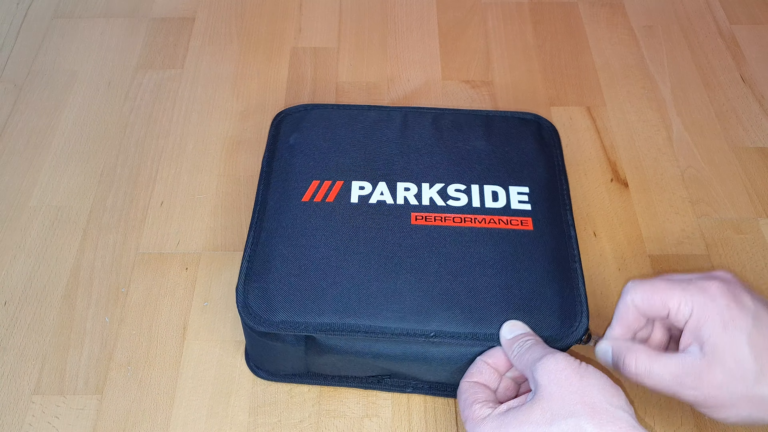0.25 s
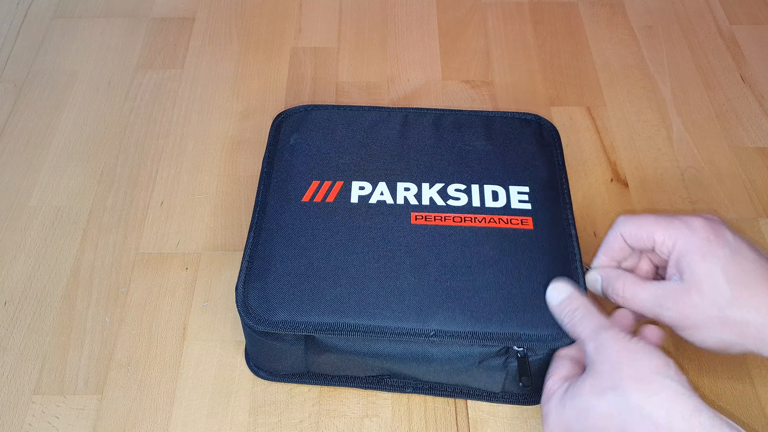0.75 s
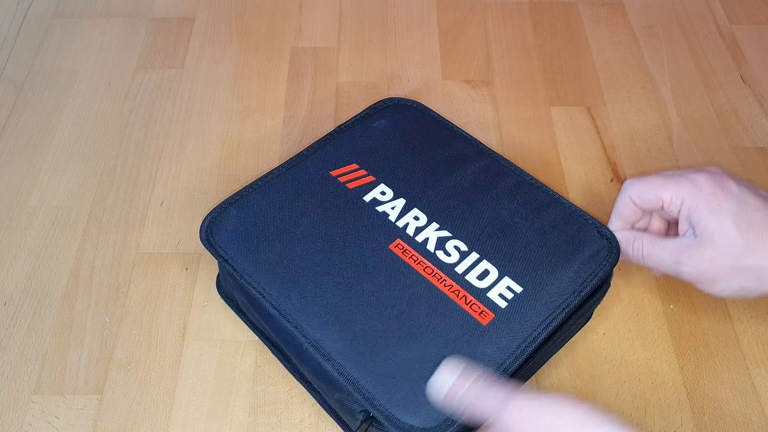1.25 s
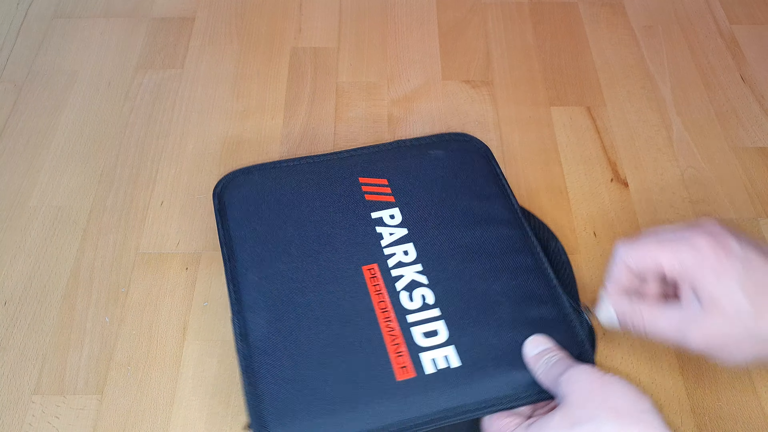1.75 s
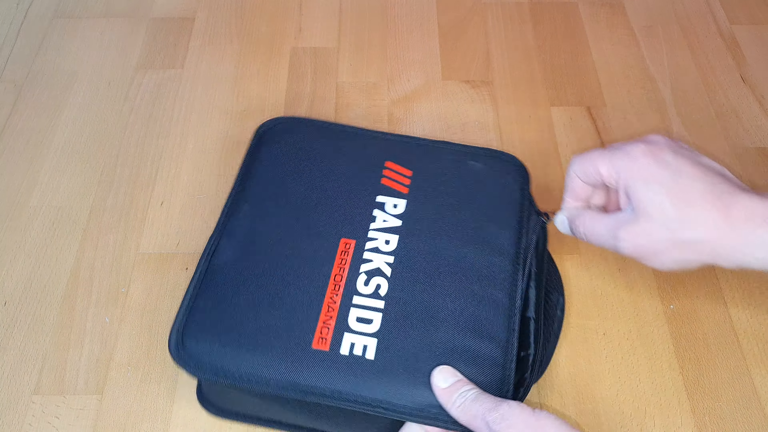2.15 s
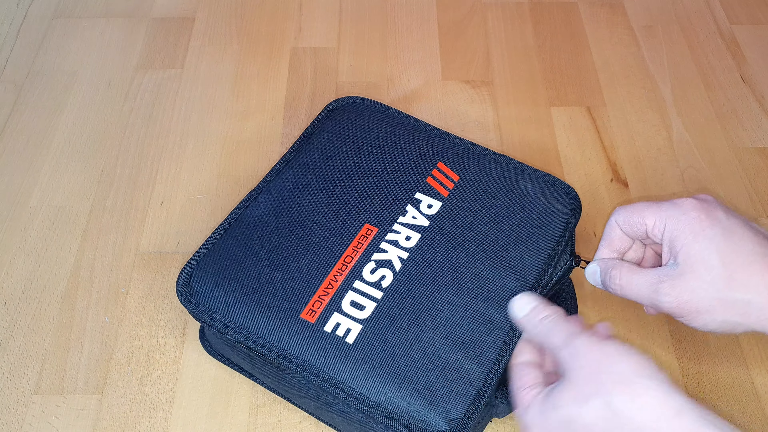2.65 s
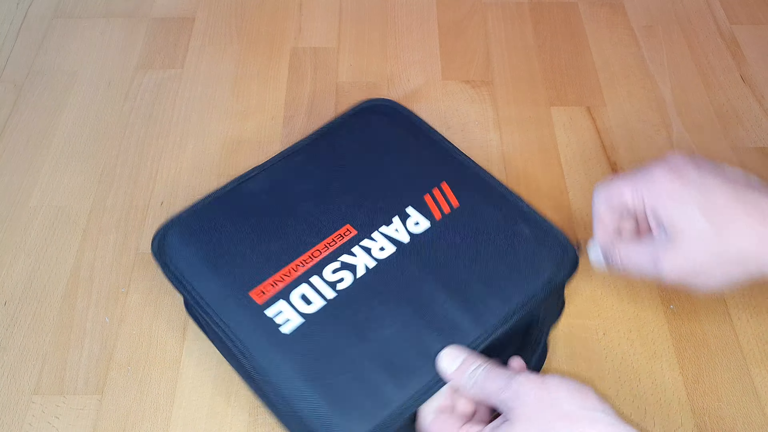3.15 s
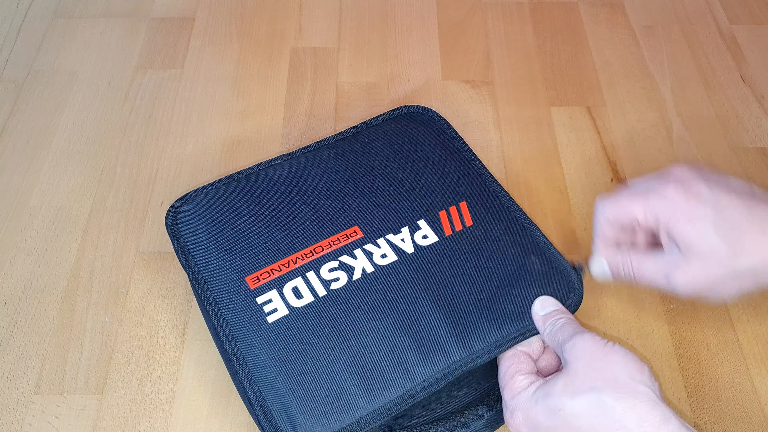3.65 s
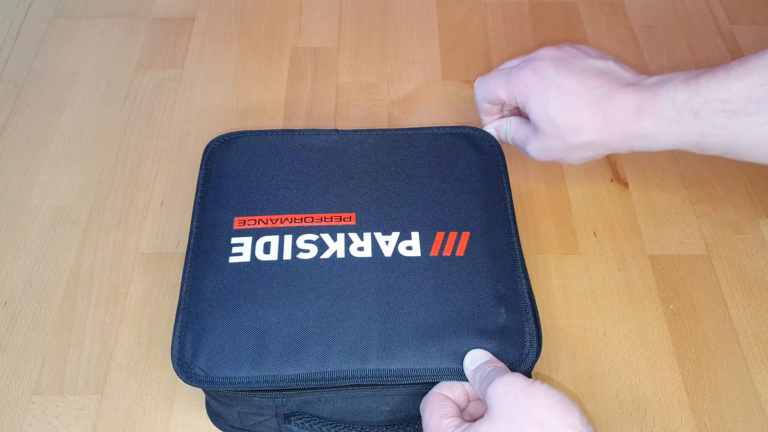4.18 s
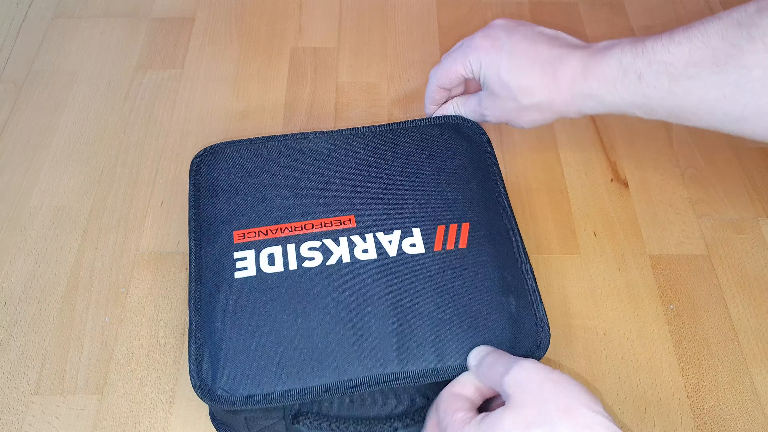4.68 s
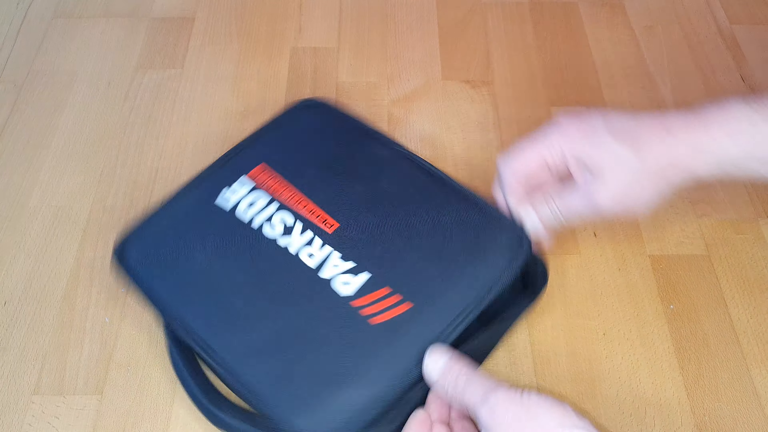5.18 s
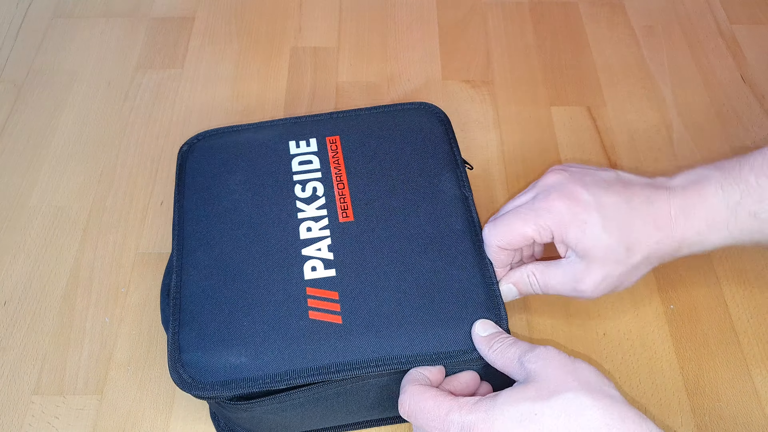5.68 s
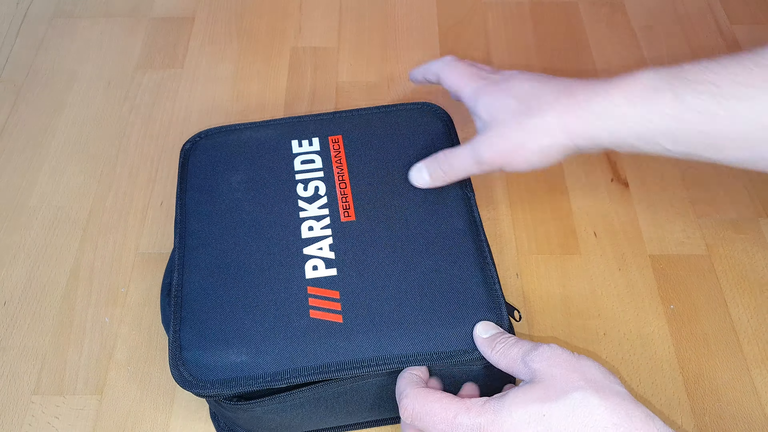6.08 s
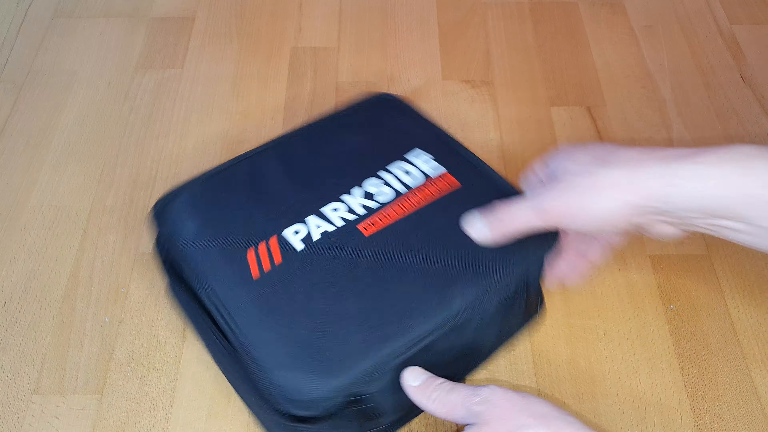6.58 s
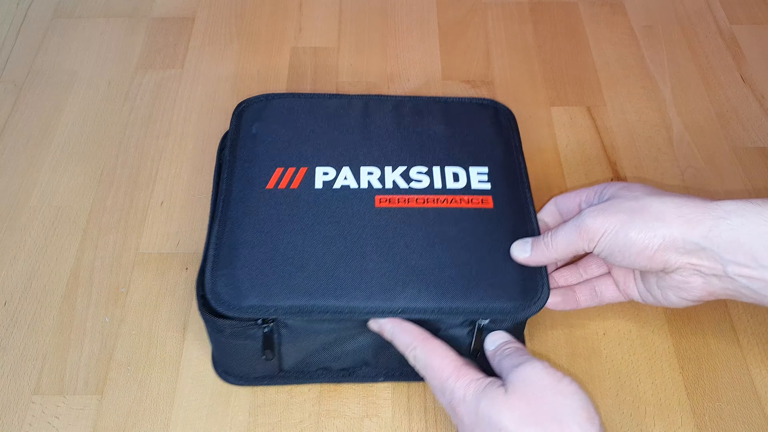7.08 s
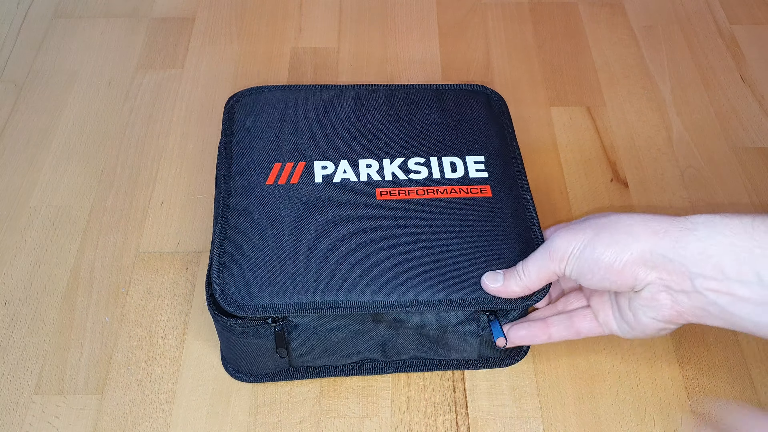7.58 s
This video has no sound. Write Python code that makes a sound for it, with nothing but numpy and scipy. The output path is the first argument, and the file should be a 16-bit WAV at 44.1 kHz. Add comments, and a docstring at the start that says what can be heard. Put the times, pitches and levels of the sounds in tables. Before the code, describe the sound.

Hands handle a stiff fabric case on a wooden table, heard close and in stereo in a quiet room. Soft cloth rubbing and a light knock open the sound. At about 1 second the zipper gives a quick, rising zip with a swish and a bump. A lower, louder buzzing pull runs from 1.8 to 2.1 seconds, slowing and ending in a knock. Cloth slides, ticks and soft hollow knocks follow, with a faint rumble from the table. The third pull, uneven and buzzy, lasts from 3.7 to 4.1 seconds. A couple of knocks come around 4.5 seconds, then the case slides and gives its strongest dull thump at 5.5 seconds. The metal pull tab jingles faintly just before 6 seconds. More hissing fabric and bumps follow from 6.4 to 7 seconds, and lighter rubbing and ticks continue until about 8 seconds.

```python
"""A zipper is pulled in three short strokes round a stiff fabric case that two hands turn on a wooden table.
The slider bumps over the teeth, making a buzz that rings the hollow case. Cloth hisses over wood and
skin, the case knocks and ticks, and the table rumbles. The metal pull tab gives one short jingle when
it is let go. The room is quiet, and two microphones listen close by."""
import sys
import numpy as np
from scipy import signal
from scipy.fft import rfft, irfft, next_fast_len
from scipy.io import wavfile
from scipy.ndimage import uniform_filter1d

SR = 44100
rng = np.random.default_rng(int(sys.argv[2]) if len(sys.argv) > 2 else 0)


def persist_wave(psi):
    """Save psi, clipped to +-1, as 16-bit WAV."""
    counts = np.round(np.clip(psi, -1, 1) * 32767).astype(np.int16)
    wavfile.write(sys.argv[1], SR, np.atleast_2d(counts).T)


N = 345303


def gain_of(db):
    return 10 ** (np.asarray(db) / 20)


def unit_level(x):
    return x / np.sqrt(np.mean(x ** 2) + 1e-20)


def curve_at(points, hz):
    """Joins (frequency, value) points and reads off the value at hz."""
    point_hz, value = np.transpose(points)
    return np.interp(np.log(hz + 1), np.log(point_hz + 1), value)


def add(mix, start_s, sound):
    part = mix[round(start_s * SR):][:len(sound)]
    part += sound[:len(part)]


def filtered(x, gain):
    """Turns each frequency up or down by gain(hz)."""
    size = next_fast_len(N + SR // 4, True)
    return irfft(rfft(x, size) * gain(np.fft.rfftfreq(size, 1 / SR)), size)[..., :N]


def coloured(x, curve):
    """Shapes a sound with a curve of (frequency, dB) points."""
    return filtered(x, lambda hz: gain_of(curve_at(curve, hz)))


def response(modes, hz):
    """How an object answers a push: its modes (ringing pitches) add up, with alternating signs."""
    return sum((-1) ** k * gain_of(db) * width * hz / (width * hz + 1j * (hz ** 2 - pitch ** 2))
               for k, (pitch, width, db) in enumerate(modes))


def ringing(x, modes, level_db):
    """An object shaken by x rings at its own pitches."""
    return unit_level(filtered(x, lambda hz: response(modes, hz))) * gain_of(level_db)


def drift(length, span):
    """A random wander, smoothed over span samples."""
    return unit_level(uniform_filter1d(uniform_filter1d(rng.standard_normal(length), span), span))


# The quiet room. Each row: frequency in Hz, relative level in dB.
ROOM_COLOUR = [(18, -47), (30, -7), (81, 5.5), (257, 2), (362, 13), (1030, -23), (2090, -86), (4470, -5),
               (11200, -14.5), (15700, -56)]


def room_noise():
    """A faint, steady rumble with a little hiss."""
    return gain_of(-75.5) * unit_level(coloured(rng.standard_normal((2, N)), ROOM_COLOUR))


def early_echoes(x, fade_s=0.035):
    """The sound after it scatters off nearby surfaces."""
    echoes = rng.standard_normal(3000) * gain_of(-60 * np.arange(3000) / SR / fade_s)
    return signal.oaconvolve(x, echoes / np.linalg.norm(echoes))[:N]


def room_tail(x, fade_s=0.13):
    """The walls return a soft echo with little bass, different at each microphone."""
    t = np.arange(12000) / SR
    echoes = rng.standard_normal((2, len(t))) * gain_of(-60 * t / fade_s) * (t > .004)
    tail = signal.oaconvolve(x, echoes / np.linalg.norm(echoes[0]), axes=1)[:, :N]
    return gain_of(-12) * filtered(tail, lambda hz: hz ** 2 / (hz ** 2 + 500 ** 2))


def slips(per_s, spread_db):
    """Rubbing is many tiny slips of uneven size; this makes two unrelated streams of them."""
    size = gain_of(spread_db * np.minimum(rng.exponential(1, (2, N)), 4))
    return unit_level(size * rng.standard_normal((2, N)) * (rng.random((2, N)) < per_s / SR))


def move_levels(rows, steepness, rounding=1.148):
    """Hand moves swell, hold and fade. Gives three layers' levels in dB, each with its own steepness."""
    t = np.arange(0, N / SR + .01, .002)
    full_s, rise, hold, fall, db, second_db, third_db = np.transpose(rows)[:, :, None]
    before = np.maximum(full_s - t, 0) / np.maximum(rise, .01)
    after = np.maximum(t - full_s - hold, 0) / np.maximum(fall, .01)
    drop_db = 20 * (before + after) ** rounding
    levels = []
    for offset_db, steep in zip((0, second_db, third_db), steepness):
        power = (gain_of(db + offset_db - steep * drop_db) ** 2).sum(0)
        levels.append(np.interp(np.arange(N) / SR, t, 10 * np.log10(power + 1e-12)))
    return levels


def swish(x, hz, width_hz):
    """The weave sings: picks out a band of x round a moving pitch."""
    turn = np.exp(2j * np.pi * np.cumsum(hz) / SR)
    decay = np.exp(-np.pi * width_hz / SR)
    return 2 * (turn * signal.lfilter([1 - decay], [1, -decay], x / turn)).real


# Hands and cloth slide. Each row: time of full speed, then rise, hold and fall, all in seconds,
# hiss level in dB, sheen and seam levels in dB above the hiss.
# A rise or fall covers 20 dB and takes at least 0.01 seconds, whatever the row says.
RUBS = [(0, .1, 0.004, 0.13, -58.5, -8, 2), (.24, 0, .01, .1, -65, -16, -8),
        (0.327, .08, 0.054, 0.14, -51, -5.5, 0), (0.466, .1, 0.027, 0.14, -51, -4.5, 4),
        (0.755, .1, 0.044, 3, -62, -5, 5.5), (0.913, 0.13, 0.097, 0.08, -48.5, -15, -3.5),
        (1.075, 0.1271, 0.015, 0.13, -36, -3.5, -4), (1.2, .1, 0.0075, 0.1, -54, -7, -3),
        (1.341, 0.04, .14, 0.2, -51.5, -5, -11), (1.533, 0.1, .005, .07, -50.5, -1.5, -9),
        (1.605, 0.1, 0.1, -0.2, -52, -10, -3.5), (1.734, 0.01, 0.0089, 0.15, -46, 1.5, 2),
        (1.824, 0.09, 0.17, 0.23, -48.5, -7.5, 4), (2.16, 0.43, 0.15, 0.13, -51, -8.5, -8.5),
        (2.397, 0.12, .016, 0.08, -47.5, -11.5, -5.5), (2.6, .04, .15, 0.3, -74, -14, -12),
        (2.81, .02, .03, .06, -65, -9, -2), (2.91, .08, 0.0091, .17, -50.5, -5, 2.5),
        (3.06, .03, .04, .1, -54, -11, -9), (3.17, .18, 0.089, .15, -47, -7, -8.5),
        (3.643, 0.12, .01, -0.5, -60, -3, -2), (3.711, 0.09, .03, 0.14, -55.5, -8, 10),
        (3.887, .25, 0.12, 0.1643, -44.5, -7.5, -0.5), (4.22, -2, .1, 1, -75, -12, -0.5),
        (4.394, 0.08, 0.033, .12, -65, -14, -4), (4.5, 0.09, .02, .1, -50, -17, 0.5),
        (4.557, .06, 0.017, 0.12, -49.5, -5, -5.5), (4.83, .04, .02, .15, -64.5, -6, -8),
        (4.982, .15, .005, 0.7, -54, -5.5, 1), (5.151, 0.24, 0.14, 0.23, -43, -7.5, -5.5),
        (5.509, 0.06, .005, 0.19, -47.5, -4, -1.5), (5.627, -0.3, .005, 0.18, -59.5, -11, 5),
        (5.803, 0.7, 0.15, 0.1, -65, -7, -6.5), (6.24, 0.09, 0.08, 0.8, -54, -6, -5.5),
        (6.37, .2, 0.038, 0.1, -48, -5.5, -7.5), (6.519, 0.1661, 0.082, 0.33, -42, -4.5, -10.5),
        (6.726, 0.06, .02, .15, -48.5, -11, 1.5), (6.875, .15, 0.062, 0.3, -45.5, -10, -9.5),
        (7.076, 0.08, .03, 0.28, -51, -15, -9), (7.16, 0.04, 0.037, 0.16, -49.5, -4, -6.5),
        (7.32, 0.1, 0.067, 0.3, -53, -1, -4), (7.475, -0.12, 0.052, 0.15, -56, -16.5, 2),
        (7.679, .05, 0.0043, 0.05, -51, 2.5, -8), (7.76, 0.12, .03, .1, -51.5, -7, -2.5),
        (7.82, 0.09, .01, .1, -46, -13, -1.5)]
# The cloth's hiss and its higher, silky sheen. Each row: frequency in Hz, relative level in dB.
HISS_COLOUR = [(1200, -40), (2150, -5.5), (2650, -1), (3050, -0.5), (3600, -4.5), (4500, -1), (6000, -4),
               (7000, -7), (7600, -25), (11000, -20)]
SHEEN_COLOUR = [(3820, -78), (6500, -10.5), (7680, -2), (12600, -2.5), (15000, -9.5), (15700, -2)]
# How the stiff seams ring. Each row: pitch in Hz, width in Hz, relative level in dB.
SEAM_MODES = [(940, 238, 3), (1099, 140, 3.5), (1206, 54, 4), (1318, 128, 0), (1552, 112, 3),
              (1700, 200, 2), (2090, 680, -7)]


def rubbing(jolts):
    """Fine slips make the cloth hiss; with coarser jolts they ring the seams. Gives cloth and seams."""
    moving_db = move_levels(RUBS, steepness=(1, 1.22, 1.14))
    resting_db = (-81, -90, -88)  # even resting hands rustle a little
    hiss_db, sheen_db, seam_db = (20 * np.log10(np.hypot(gain_of(moving), gain_of(resting)))
                                  for moving, resting in zip(moving_db, resting_db))
    fibres = slips(per_s=9000, spread_db=0.3)
    cloth = coloured(fibres, HISS_COLOUR)
    swish_hz = 3395 - 30 * (seam_db - hiss_db)  # the harder the seams scrape, the lower the swish
    hiss = unit_level(cloth + 0.92 * swish(cloth, swish_hz, width_hz=890)) * gain_of(hiss_db)
    sheen = unit_level(coloured(slips(per_s=13000, spread_db=0.5), SHEEN_COLOUR)) * gain_of(sheen_db)
    return hiss + sheen, ringing(jolts + 1.17 * fibres, SEAM_MODES, seam_db)


# The case is pressed, dragged or turned. Each row: time of full force, then rise, hold and fall
# in seconds as in RUBS, case level in dB, lid and table levels in dB above the case.
PUSHES = [(0, .1, 0.003, 0.08, -49.5, -6.5, 3), (.33, 0.1, 0.082, .12, -40, -2.5, -15),
          (.48, 0.07, 0.015, 0.07, -40.5, -1, -6.5), (.72, 0.12, 0.25, 0.2, -50, -5.5, 1),
          (1, 0.0754, 0.034, 0.08, -35.5, -4, -12), (1.11, 0.02, 0.025, 0.0337, -26, -11, -9.5),
          (1.2, 1.12, .005, .18, -51.5, -4, 2), (1.43, 0.13, 0.11, .05, -45.5, -12.5, -13),
          (1.57, .03, 0.0039, 0.22, -41.5, -12, -11.5), (1.73, -0.09, 0.091, .1, -39.5, -5.5, -15),
          (1.89, -0.03, 0.16, 0.0643, -30.5, -14, -32), (2.1, 0, 0.0042, 0.35, -49, -11, -5),
          (2.36, -0.3, 0.064, 0.12, -52, -3.5, -4.5), (2.615, .03, 0, .15, -56, -9, -8),
          (2.89, 0.04, 0.011, 0.12, -36, -2.5, -18), (3.01, 0.08, 0.0046, 0.4, -52.5, -5, 8),
          (3.18, 0.05, .07, 0.2, -48, -2, -2.5), (3.52, 0, .01, 0.5, -69.5, -4.5, 13),
          (3.62, 0.04, 0.16, -0.03, -40, -13.5, -14.5), (3.79, 0.0827, 0.093, 0.084, -25.5, -10.5, -40),
          (4.01, 0.0532, .03, 0.06, -26, -25, -34), (4.12, -0.36, 0.0041, 0.2, -50.5, -14, -1),
          (4.27, .1, .005, 0.2, -59, -12, -1), (4.4, -0.07, 0.079, .1, -41, -11, -13),
          (4.51, 0.07, 0.0045, 0.14, -34.5, -7.5, -10), (4.575, 0.02, 0.0034, 0.16, -46.5, -13, 9.5),
          (4.73, -0.2, 0.0044, 0.61, -53, -21, -9), (4.97, 0.12, .005, 0.1, -44.5, -5.5, -4),
          (5.15, .16, .01, 0.07, -39.5, -6, -8.5), (5.23, .08, 0.0034, 0.21, -37.5, -3, -4),
          (5.515, .07, 0.0031, 0.205, -38.5, -4, -15), (5.63, 0.5, 0.018, -0.04, -53, -5, -4),
          (5.84, 0.2, 0.063, 0.31, -53.5, -2.5, -7), (6.23, 0.02, 0.044, 0.3, -51, -12, 6.5),
          (6.36, 0, 0.071, 0.7, -54.5, -6, -4), (6.52, .1, 0.0045, .15, -43, -7.5, -10.5),
          (6.69, -0.03, 0.0039, .13, -35.5, -7, -5), (6.87, 0.05, .005, 0.16, -43.5, -17, -10),
          (7, .1, .005, -0.06, -47.5, -9, -8), (7.1, .1, 0.18, 0.5, -53, -9, -8),
          (7.27, 0, .01, 0.2, -52.5, -13, 1), (7.33, .06, .005, 0.2, -49, -5, -8),
          (7.45, 0.1, .03, 0.17, -49, -4.5, -8.5), (7.7, -0.03, 0.046, 0.8, -48, -15, -3),
          (7.82, 0, .01, .1, -41.5, -8, -13)]
# How the hollow case, stiff lid and table ring. Each row: pitch in Hz, width in Hz, relative level in dB.
CASE_MODES = [(173, 33, -8), (231, 60, -5.5), (312.1, 21.8, 3), (364.8, 20.7, 2), (405.3, 17, 1),
              (493.5, 53, -4.5)]
LID_MODES = [(573, 67, -3.5), (624.6, 44, -2.5), (693, 63, -1), (707.5, 178, -5)]
TABLE_MODES = [(54, 9.5, -4), (68.8, 17.5, -0.5), (92.6, 66, -6.5)]


def pushing(jolts):
    """Coarse slips ring the case, its lid and the table top. Gives case with lid, and table."""
    case_db, lid_db, table_db = move_levels(PUSHES, steepness=(1, 1.07, 1))
    # while the slider runs steadily, the uneven ringing of the case is turned down
    zipping = sum((np.arange(N) / SR > rows[0][0] + .02) & (np.arange(N) / SR < rows[-1][0])
                  for rows in ZIP_STROKES)
    case = ringing(jolts, CASE_MODES, case_db - 9 * uniform_filter1d(zipping * 1., 800))
    lid = ringing(jolts, LID_MODES, lid_db)
    table = ringing(slips(per_s=150, spread_db=2.5), TABLE_MODES, table_db)
    return case + lid, table


# A hand or the slider sticks, then lets go. Each row: time in seconds, cloth jump in dB, case jump in dB.
CATCHES = [(.289, -2, 1), (.685, 15, 9), (1.335, 3, -8), (1.418, 1, 12.5), (2.601, 8, 12), (2.8, 5, 3),
           (2.852, -4, 4.5), (3.575, -5, 7), (3.608, 12, -1), (4.391, 0, 12), (4.475, 4, -1),
           (4.805, 9, 12), (5.494, 9, 10.5), (6.187, 7.5, 9.5), (6.205, 4, 10), (6.678, 6, 9),
           (7.664, 5, 8)]


def catches():
    """Motion is held back before each release and overshoots after it. Gives gains for cloth and case."""
    around = np.arange(-4000, 4000) / SR
    step = np.sign(around) * np.exp(-abs(around) / 0.017) / 2
    cloth_db, case_db = np.zeros((2, N))
    for time_s, cloth_jump_db, case_jump_db in CATCHES:
        add(cloth_db, time_s + around[0], cloth_jump_db * step)
        add(case_db, time_s + around[0], case_jump_db * step)
    return gain_of(cloth_db), gain_of(case_db)


def handling():
    """The hands rub and push the case, and the catches make the sound jerk."""
    jolts = slips(per_s=2000, spread_db=2.1) * gain_of(drift(N, span=400))
    cloth, seams = rubbing(jolts)
    case, table = pushing(jolts)
    cloth_jump, case_jump = catches()
    return cloth * cloth_jump + (seams + case) * case_jump + table


# Crisp ticks. Each row: start in seconds, level in dB, treble in dB above that level, pitch in Hz.
TICKS = [(0.1983, -65, -22, 3200), (0.2887, -54, -12, 1640), (0.6853, -60, -30, 1550),
         (0.8963, -38, -23, 2840), (1.3357, -41, -17, 4470), (1.528, -32.5, -8.5, 2380),
         (1.612, -39, -26, 1560), (1.7194, -34, -3, 1350), (1.8712, -28, -25, 1180),
         (2.1041, -36, -31, 2530), (2.3296, -31, -30, 1485), (2.8035, -44.5, -25, 1626),
         (2.8629, -50, -28, 1770), (3.047, -57, -23.5, 4120), (3.6107, -57, -16, 1210),
         (4.3186, -53, -27, 1550), (4.3944, -58, -21, 1210), (4.479, -39, -22, 3150),
         (4.787, -50.5, -27, 4240), (4.8112, -47, -26, 2580), (4.9387, -48, -9, 2570),
         (5.4974, -36, -11, 3080), (5.801, -52, -21.5, 4950), (5.879, -47, -15, 5840),
         (5.906, -48, -24, 4100), (6.1853, -50, -4, 4640), (6.7366, -33, -33, 1900),
         (7.19, -30.5, -24.5, 1530), (7.2848, -40, -16, 2900), (7.4816, -36, -33, 1700),
         (7.5523, -35, -26, 5400), (7.6625, -51, -4, 6030)]


def ticks():
    """Cloth and slider snap: a burst of noise round one pitch, with a bright edge and a short tail."""
    snaps, edges = np.zeros((2, 2, N))
    t = np.arange(1500) / SR
    fade = gain_of(-60 * t / 0.01) + 0.27 * gain_of(-60 * t / 0.12)
    for start_s, db, treble_db, pitch_hz in TICKS:
        for side, puff in enumerate(rng.standard_normal((2, len(t)))):
            ring = unit_level(uniform_filter1d(puff, 8)) * np.sin(2 * np.pi * pitch_hz * t)
            add(snaps[side], start_s, gain_of(db - 2.5) * fade * ring)
            add(edges[side], start_s, gain_of(db + treble_db - 0.5) * fade * puff)
    return filtered(snaps, lambda hz: hz ** 2 / (hz ** 2 + 900 ** 2)) + coloured(edges, SHEEN_COLOUR)


# Short knocks in the case. Each row: time in seconds, relative level in dB, pitch in Hz, rise in seconds.
KNOCKS = [(0.469, -25.5, 357, 0.013), (0.846, -39, 384, 0.013), (0.929, -28, 656, 0.003),
          (1.098, -21.5, 321, 0.0085), (1.119, -30, 305, 0.011), (1.418, -30, 400, 0.0035),
          (1.563, -26.5, 296, 0.0088), (1.613, -35, 413, 0.009), (2.074, -21.5, 320, 0.008),
          (2.185, -36.5, 408, 0.0077), (2.86, -34.5, 450, 0.01), (2.885, -30, 343, 0.012),
          (2.934, -25, 372, 0.0068), (3.312, -33.5, 376, 0.0036), (3.614, -34.5, 379, 0.011),
          (3.681, -21.5, 305, 0.011), (4.192, -40.5, 296, 0.0057), (4.246, -40.5, 355, 0.0056),
          (4.3, -43, 315, 0.0071), (4.4, -38, 328, 0.0056), (4.467, -22.5, 390, 0.015),
          (4.557, -25, 309, 0.0085), (4.674, -35, 360, 0.0038), (4.712, -38, 359, 0.0092),
          (4.728, -39.5, 360, 0.0099), (4.951, -31, 371, 0.012), (5.095, -34, 370, 0.0055),
          (5.239, -30, 398, 0.0086), (5.507, -15, 316, 0.011), (5.633, -30, 364, 0.0066),
          (5.846, -36, 383, 0.0096), (5.948, -33, 631, 0.013), (6.21, -34.5, 287, 0.0052),
          (6.51, -29.5, 348, 0.01), (6.692, -22, 346, 0.011), (6.826, -37, 351, 0.008),
          (6.874, -28, 361, 0.0074)]


def knocks():
    """Each knock swells softly in the hollow case; the cloth damps it quickly, leaving a faint ring."""
    out = np.zeros(N)
    t = np.arange(6000) / SR
    for time_s, db, hz, rise_s in KNOCKS:
        age = t / rise_s
        swell = age ** 2 * np.exp(2 * (1 - age))
        tail = 0.078 * np.minimum(age, 1) * gain_of(-60 * t / 0.28)
        phase = 2 * np.pi * hz * t
        tone = np.sin(phase) + 0.08 * np.sin(2 * phase)
        add(out, time_s - 0.629 * rise_s, 0.44 * gain_of(db) * (swell + tail) * tone)
    return out


# The tab hits the slider. Each row: start in seconds, level in dB, extra dB for the top two pitches.
TAB_STRIKES = [(5.8032, -56, -22), (5.8303, -54, -16), (5.856, -59, -7), (5.8805, -60, 2),
               (5.9189, -58, -2), (5.953, -66, -4)]
# How the metal tab rings. Each row: pitch in Hz, relative level in dB, seconds to fade by 60 dB.
TAB_MODES = [(5050, -7, .1), (11480, 2.5, 0.14), (11650, -9, .08), (14950, 6, .16), (15150, -1, .08)]


def pull_tab():
    """Each strike rings the tab; where it lands decides how strong the highest pitches are."""
    out = np.zeros(N)
    t = np.arange(8000) / SR
    attack = np.minimum(t / .002, 1)
    for start_s, strike_db, upper_db in TAB_STRIKES:
        for hz, db, fade_s in TAB_MODES:
            level_db = strike_db - 3 + db + upper_db * (hz > 13000)
            detuned_hz = hz * (1 + 0.0025 * rng.standard_normal())
            tone = np.sin(2 * np.pi * detuned_hz * t)
            add(out, start_s, gain_of(level_db - 60 * t / fade_s) * attack * tone)
    return out


# How the metal slider rings. Each row: pitch in Hz, width in Hz, relative level in dB.
SLIDER_MODES = [(3030, 950, 2.5), (4440, 1600, -12.5), (12050, 2800, -7.5)]


def body_gain(hz):
    """How strongly case, lid, seams and slider together pass on each frequency."""
    parts = (CASE_MODES, 1), (LID_MODES, 0.21), (SEAM_MODES, 0.055), (SLIDER_MODES, 0.11)
    power = sum(share * abs(response([mode], hz)) ** 2 for modes, share in parts for mode in modes)
    return np.sqrt(power + .015)


def zip_stroke(rows, slope_db, brighten_db, brightest_db, rasp_db):
    """The slider gives one uneven pulse and a scratch of grit per tooth. Gives buzz and rasp."""
    times, rates, levels = np.transpose(rows)
    t = np.arange(times[0], times[-1], 1 / SR)
    hz, buzz_db = np.interp(t, times, rates), np.interp(t, times, levels)
    octaves = np.log2(hz / hz.max())  # zero at top speed, negative when slower
    slope_db = np.minimum(slope_db - brighten_db * octaves, brightest_db)
    # teeth come early or late, which smears the overtones more than the lowest tone
    teeth_passed = np.cumsum(hz) / SR + 0.019 * (hz / 350) ** 0.57 * drift(len(t), span=100)
    pulses = sum(gain_of(slope_db * (k - 1)) * body_gain(k * hz) * np.cos(2 * np.pi * k * teeth_passed)
                 for k in range(1, 7))
    uneven_db = 2.1 * np.sqrt(hz / 350) * drift(len(t), span=200)
    buzz = np.sqrt(2) * gain_of(buzz_db + uneven_db) * pulses / body_gain(hz)
    grit = rng.standard_normal(len(t)) * (0.275 + np.exp(-(teeth_passed % 1) / 0.25))
    rasp = unit_level(grit) * gain_of(rasp_db + 11 * octaves)  # 11 dB softer at half speed
    return np.array([buzz, rasp]) * signal.windows.tukey(len(t), .1)


# The pulls, one list each. Each row: time in seconds, teeth per second, buzz level in dB.
ZIP_STROKES = [
    [(.96, 187, -60.5), (1, 431.8, -42), (1.03, 686, -44), (1.056, 939, -38), (1.078, 1070, -33),
     (1.098, 1122, -39), (1.13, 1112, -48), (1.19, 1066, -45)],
    [(1.76, 252, -57.5), (1.783, 273.8, -26), (1.797, 295, -27), (1.806, 310, -22), (1.848, 315, -22.5),
     (1.86, 341.3, -33), (1.882, 391, -34), (1.91, 351.4, -36), (2, 213.6, -39), (2.038, 166, -39),
     (2.06, 152, -43)],
    [(3.72, 179.5, -49.5), (3.745, 213.8, -28.5), (3.774, 252, -35.5), (3.787, 341.3, -22),
     (3.823, 291.8, -28.5), (3.845, 324, -25), (3.862, 407.2, -22), (3.895, 407, -20), (3.91, 452, -29),
     (3.953, 498, -34), (3.98, 439.7, -31.5), (4.01, 306.8, -35.5), (4.04, 216, -36), (4.065, 188, -41)],
]
# The grip for each pull. Each row: step in dB from one overtone to the next at top speed, dB added
# to that step each time the speed halves, upper limit of the step in dB, rasp drive at top speed in dB.
ZIP_GRIPS = [(-1.5, -3, -1.5, -44), (-11, 9, -3.5, -44.5), (-22, 24.5, -5.5, -41.5)]


def zipper():
    """The teeth buzz through the case while their rasp rings the metal slider."""
    buzz, rasp = np.zeros((2, N))
    for rows, grip in zip(ZIP_STROKES, ZIP_GRIPS):
        start_s = rows[0][0]
        stroke_buzz, stroke_rasp = zip_stroke(rows, *grip)
        add(buzz, start_s, stroke_buzz)
        add(rasp, start_s, stroke_rasp)
    return buzz + filtered(rasp, lambda hz: 2 * response(SLIDER_MODES, hz))


# How alike the two microphones sound. Each row: frequency in Hz, likeness from 0 to 1.
LIKENESS = [(40, 0.91), (130, 0.86), (290, 1), (640, 0.53), (1400, 0.13), (3100, 0.18), (6800, 0.01)]
# How the sound leans to one side. Each row: frequency in Hz, left minus right in dB.
BALANCE = [(60, -3), (120, -1), (240, 1), (480, -1.5), (950, 4.5), (1890, 4.5), (3770, 4.5), (7520, 6),
           (15000, 1.5)]


def microphone_pair(left, other):
    """Blends two versions of the sound into left and right, alike in the bass only."""
    alike = lambda hz: curve_at(LIKENESS, hz)
    right = filtered(left, alike) + filtered(other, lambda hz: np.sqrt(1 - alike(hz) ** 2))
    # unlike parts lose half their power in the centre, so they are lifted on each side
    lift = lambda hz: np.sqrt(2 / (1 + alike(hz)))
    lean = lambda hz: gain_of(np.outer([.5, -.5], curve_at(BALANCE, hz)))
    return filtered(np.array([left, right]), lambda hz: lift(hz) * lean(hz))


def scene():
    """Zipper, knocks and tab join the handling and the room at the two microphones."""
    struck = zipper() + knocks() + pull_tab()
    room = room_noise()
    left, other = np.array([struck, early_echoes(struck)]) + handling() + ticks() + room
    stereo = microphone_pair(left, other)
    return stereo + room_tail(stereo)


def record(dry, bass_cut_hz=45, treble_cut_hz=15760):
    """The microphones drop the deepest bass and the highest treble."""
    heard = filtered(dry, lambda hz: (1j * hz / (bass_cut_hz + 1j * hz)) ** 2)
    low_pass = signal.firwin(1023, treble_cut_hz, window=("kaiser", 9), fs=SR)
    return signal.oaconvolve(heard, low_pass[None], "same")


dry = scene()
out = record(dry)
persist_wave(out)
```